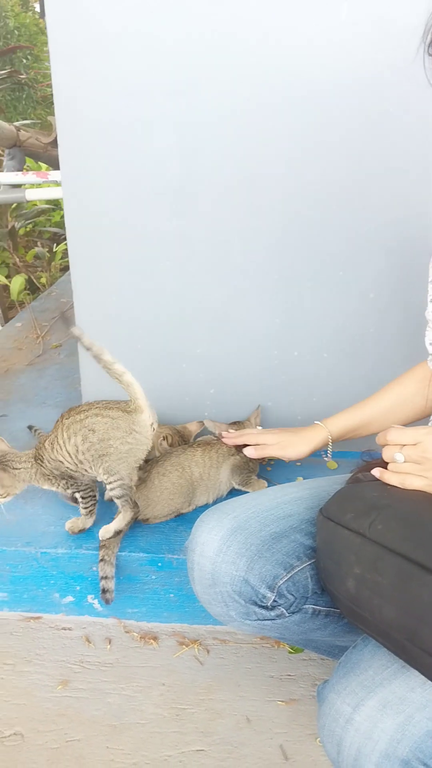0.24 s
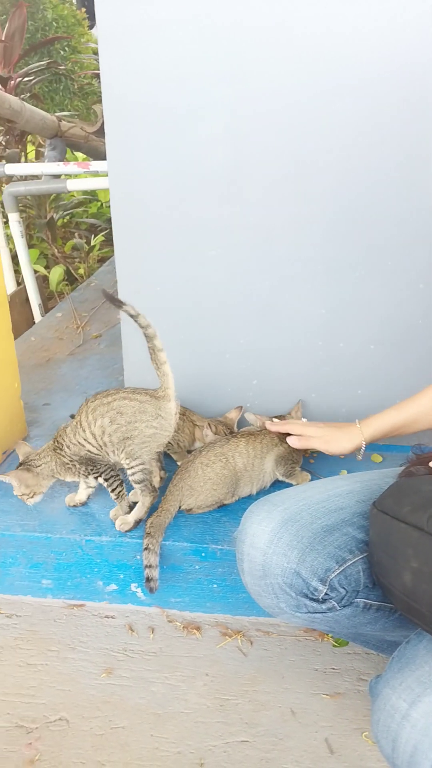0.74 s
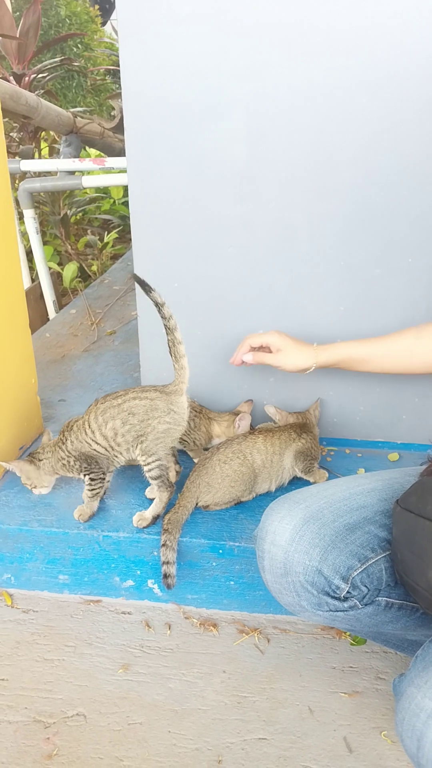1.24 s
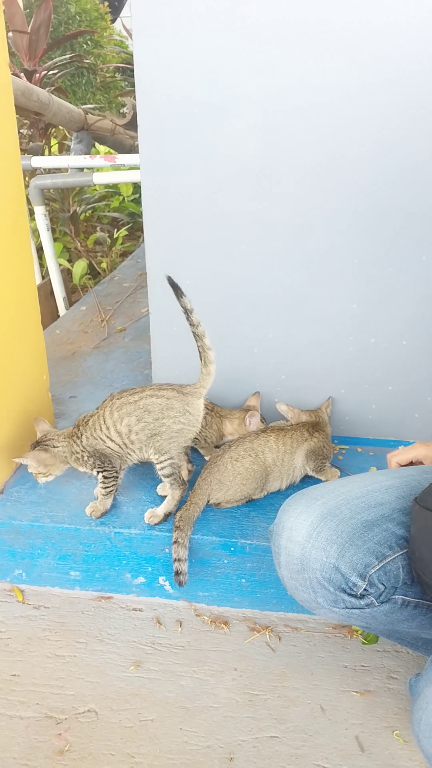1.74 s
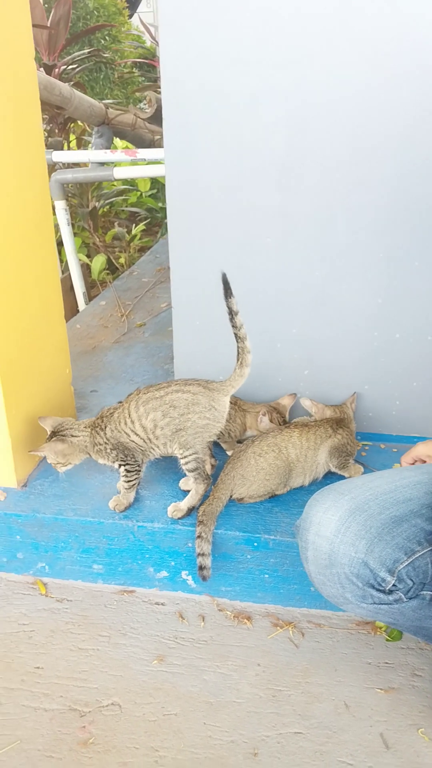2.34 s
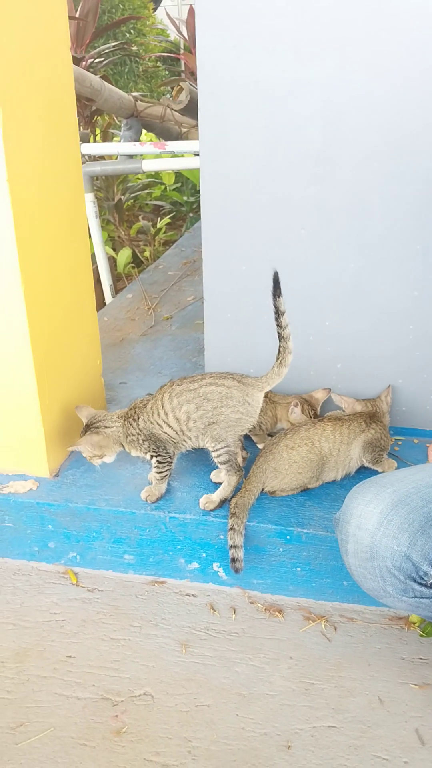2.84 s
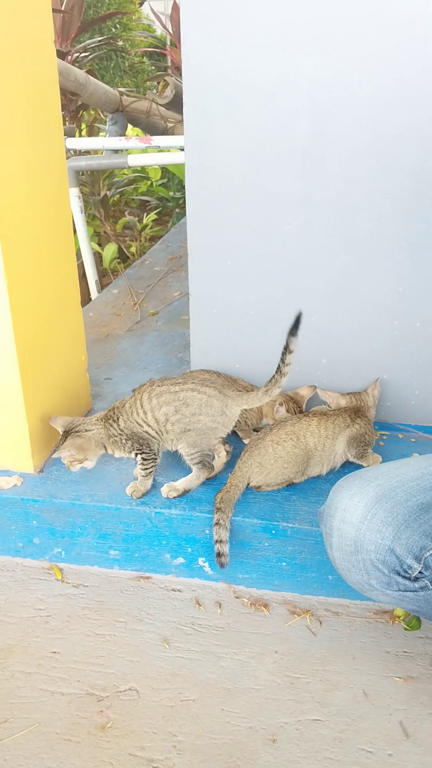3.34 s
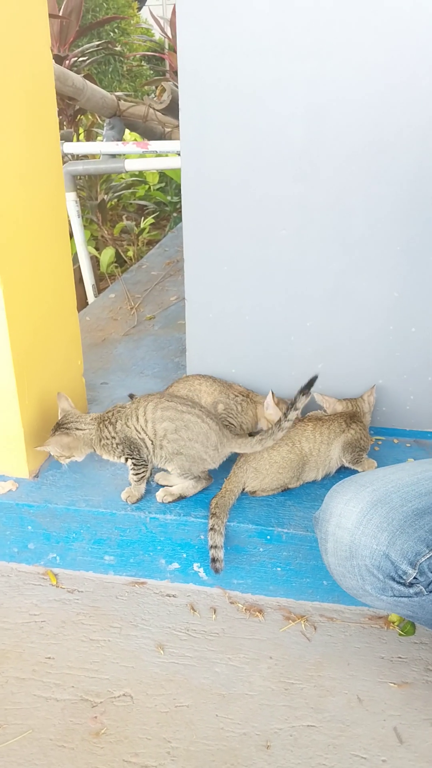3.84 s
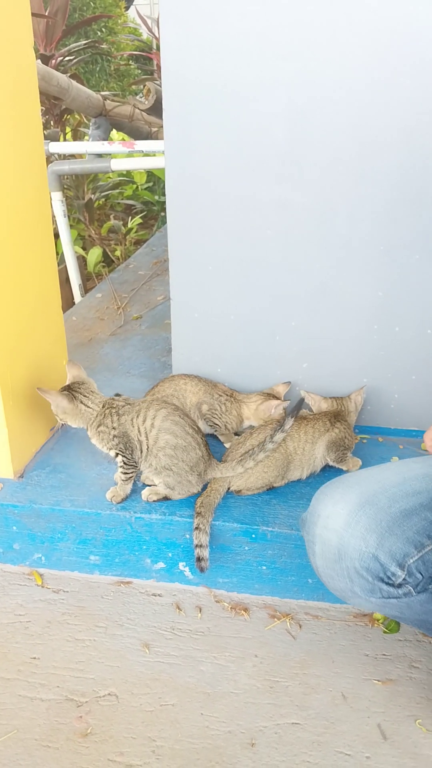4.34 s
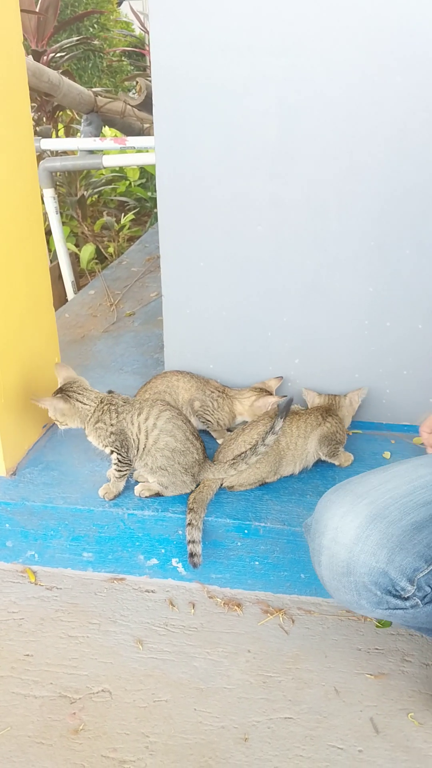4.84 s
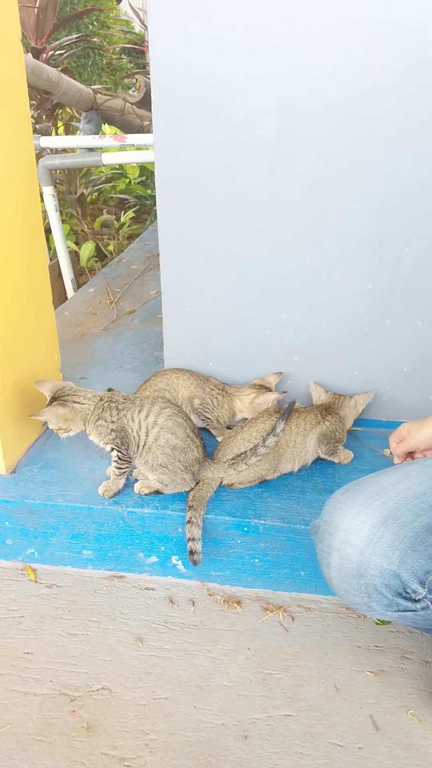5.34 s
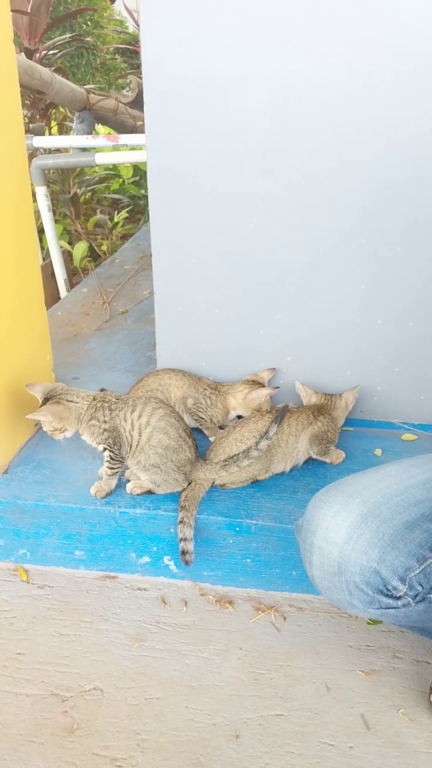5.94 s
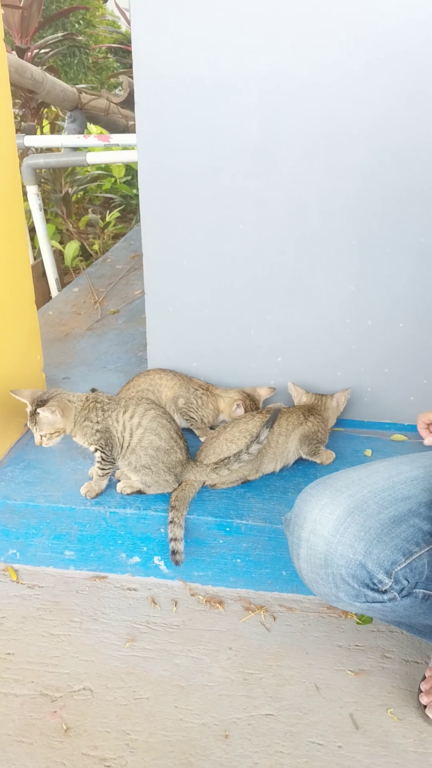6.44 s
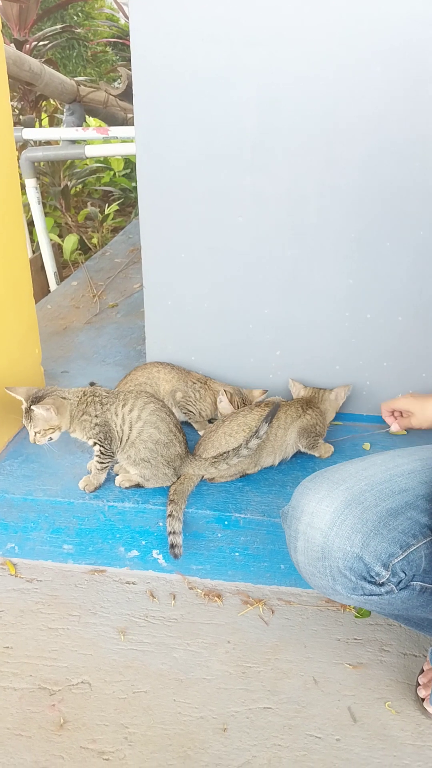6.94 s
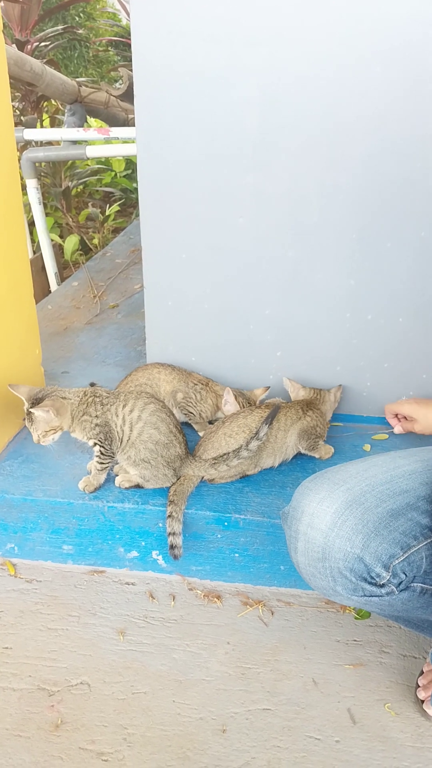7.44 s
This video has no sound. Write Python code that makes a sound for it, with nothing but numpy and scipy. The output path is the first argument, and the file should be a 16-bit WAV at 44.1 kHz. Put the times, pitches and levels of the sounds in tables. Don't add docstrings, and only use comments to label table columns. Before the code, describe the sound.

Throughout, a low, muffled road rumble with gentle roar and soft tyre hiss fills an outdoor spot beside a wall, picked up in stereo by a phone. From about 0.2 to 3.7 s two distant single-cylinder engines putter over each other, pulses slowing, tone hollowing and swelling through wall echoes, with thin gear whines. A far cutting disc sings faintly and high, strengthening near 2.6 s, biting in stuttering bursts from 3.4 to 4.6 s, then fading to small nicks. At 4.1 s a nearer engine enters, swells to its loudest around 4.7 s, dips at 5.1, rises again at 5.5, then recedes and slows in a deep chug until the end at about 7.6 s. Very faint, short falling kitten mews come at 4.7, 5.3 and 5.5 s, almost buried. Tiny bright grit ticks fall at 5.2, 5.7, 6.1 and 7.0 s.

```python
import sys
import numpy as np
from scipy import signal
from scipy.fft import rfft, irfft, next_fast_len
from scipy.io import wavfile
from scipy.ndimage import uniform_filter1d, map_coordinates

SR = 44100
rng = np.random.default_rng(int(sys.argv[2]) if len(sys.argv) > 2 else 0)


def wrap_up_sound(samples):
    columns = np.atleast_2d(samples).T
    tamed = np.clip(columns, -1, 1)
    steps = np.round(tamed * 32767).astype(np.int16)
    wavfile.write(sys.argv[1], SR, steps)


def level_to_linear(level):
    exponent = np.asarray(level, float) / 20
    return 10 ** exponent


N = 339129


def unit(x):
    return x / np.sqrt(np.mean(x ** 2) + 1e-20)


def along(points, hz):
    f, v = np.transpose(points)
    return np.interp(np.log(hz + 1), np.log(f + 1), v)


def curves(rows):
    s, *cols = np.transpose(rows)
    return [np.interp(np.arange(N) / SR, s, c) for c in cols]


def wobble(rate_hz):
    knots = rng.standard_normal(int(N * rate_hz / SR) + 4)
    return map_coordinates(knots, [np.arange(N) * rate_hz / SR])


def filtered(x, response):
    m = next_fast_len(N + SR // 2)
    return irfft(rfft(x, m) * response(np.fft.rfftfreq(m, 1 / SR)), m)[..., :N]


def shaped(spectrum):
    return lambda hz: level_to_linear(along(spectrum, hz)) * (hz > .8 * spectrum[0][0])


def ringing(modes):
    def response(f):
        total = 0
        for k, (centre, width, db) in enumerate(modes):
            loss = 1j * f * width
            total = total + (-1) ** k * level_to_linear(db) * loss / (centre * centre - f * f + loss)
        return total
    return response


# [f/Hz, correlation]
PORT_LIKENESS = [(60, 0.62), (130, 1), (290, 0.84), (640, 0.64), (1410, -0.0021), (3100, -0.14),
                 (6820, -0.15), (15000, -0.028)]


def rush(gain, patchy_db=0):
    z = signal.stft(rng.standard_normal((2, N)), nperseg=512)[2]
    field = uniform_filter1d(rng.standard_normal(z.shape[1:]), 5, 0)
    field = uniform_filter1d(field, 16, 1)
    pair = signal.istft(z * level_to_linear(patchy_db * unit(field)), nperseg=512)[1][:, :N]

    def mid_side_gain(hz):
        turn = np.arccos(np.clip(np.abs(along(PORT_LIKENESS, hz)), 0, 1)) / 2
        return gain(hz) * [np.cos(turn), np.sin(turn)]

    mid, side = filtered(pair, mid_side_gain)
    return np.array([mid + side, mid - side]) / np.std(mid)


def glides(rows):
    out = np.zeros(N)
    for s, length_s, start_hz, end_hz, *orders_db in rows:
        hz = np.linspace(start_hz, end_hz, round(length_s * SR))
        phase = 2 * np.pi * np.cumsum(hz) / SR
        tone = sum(level_to_linear(db + 2.5) * np.sin((k + 1) * phase) for k, db in enumerate(orders_db))
        out[round(s * SR):][:len(hz)] += tone * np.sqrt(np.hanning(len(hz)))
    return out


# [t/s, level/dB]
ROAD_LEVEL = [(.05, -40.5), (.75, -42), (1.35, -40), (1.65, -40), (2.35, -40.5), (2.65, -39.5), (3.1, -41),
              (3.3, -41), (3.7, -42), (4.35, -41), (4.8, -43.5), (5.2, -45.5), (5.9, -44), (6.3, -43.5),
              (6.7, -43.5), (7.1, -43.5), (7.6, -43.5)]
# [f/Hz, level/dB per Hz]
RUMBLE_SPECTRUM = [(13, -68.5), (22, -39), (38, -18), (59, -6.5), (69, -4), (108, 1.5), (140, -1.5),
                   (232, -4), (269, -17), (309, -18), (420, -21.5), (550, -41.5), (920, -120)]
# [f/Hz, level/dB per Hz]
ROAR_SPECTRUM = [(140, -38), (235, -2.5), (290, -4), (314, -12.5), (354, -16.5), (481, -15), (637, -14),
                 (759, -17.5), (1050, -17.5), (1710, -30), (1900, -26), (2470, -59), (4180, -120)]
# [f/Hz, level/dB per Hz]
TYRE_SPECTRUM = [(760, -16), (1300, -1.5), (1670, -3.5), (2140, -6.5), (3070, -8), (3700, -12), (4150, -13),
                 (7500, -22), (8400, -27.5), (12500, -31.5), (15500, -44)]


def road():
    rumble_db, roar_db, hiss_db = 15.3, 5, -5
    rumble_share, hiss_share = .45, 1
    road_db, = curves(ROAD_LEVEL)
    mean_db = road_db.mean()
    swing_db = road_db - mean_db
    rumble_db = mean_db + rumble_db + rumble_share * swing_db + 0.52 * wobble(6.7)
    roar_db = road_db + roar_db + 0.46 * wobble(6)
    hiss_db = mean_db + hiss_db + hiss_share * swing_db + 0.2 * wobble(7.2)
    rumble = level_to_linear(rumble_db) * rush(shaped(RUMBLE_SPECTRUM), patchy_db=0.6)
    roar = level_to_linear(roar_db) * rush(shaped(ROAR_SPECTRUM), patchy_db=0.67)
    hiss = level_to_linear(hiss_db) * rush(shaped(TYRE_SPECTRUM), patchy_db=0.38)
    return rumble + roar + hiss


# [t/s, length/s, f/Hz, level/dB]
WHINE_LINES = [(0, .3, 232, -30), (.85, .35, 632, -47), (1.1, .2, 798, -47), (1.15, .4, 525, -48),
               (1.3, .2, 619, -45), (2.52, .15, 589, -45), (2.6, .4, 567, -51), (2.7, .1, 1048, -48),
               (2.7, .5, 379, -47), (3.05, .2, 654, -46), (2.75, .6, 163, -27), (1.6, .4, 176, -30),
               (3.75, .25, 117, -28), (3.8, .35, 193, -32), (3.85, .65, 379, -46), (4.15, .4, 487, -47),
               (4.55, 1.2, 379, -45.5), (4.75, .35, 516, -47)]


def whines():
    sag = .006
    rows = [(s, length_s, hz, hz * (1 - sag), db) for s, length_s, hz, db in WHINE_LINES]
    return level_to_linear(1.5 * wobble(25)) * glides(rows)


# [t/s, length/s, start f/Hz, order 2 level/dB, order 3 level/dB]
CRIES = [
    (4.71, .09, 530, -45, -56),
    (4.75, .12, 520, -58, -45),
    (5.265, .06, 492, -62, -47),
    (5.5, .11, 535, -62, -50),
]


def mews():
    sag_hz_per_s, first_db = 330, -60
    rows = []
    for s, length_s, hz, *upper_db in CRIES:
        rows.append((s, length_s, hz, hz - sag_hz_per_s * length_s, first_db, *upper_db))
    return glides(rows)


# [t/s, peak level/dB]
GRIT_TICKS = [
    (5.1771, -45),
    (5.6824, -49),
    (5.6854, -48),
    (5.7164, -55),
    (6.0631, -52),
    (6.982, -45),
]


def grit():
    out, t = np.zeros((2, N)), np.arange(SR // 100) / SR
    for s, db in GRIT_TICKS:
        decay = level_to_linear(db + 4 - 60 * t / .009)
        start = round(s * SR)
        out[:, start:start + len(t)] += decay * np.sign(rng.standard_normal(len(t)))
    return filtered(out, lambda hz: 1 / (1 + (9000 / (hz + 1)) ** 6))


# [t/s, level/dB]
CUTTING = [(0.1, -61), (0.58, -57), (1.2, -54), (1.8, -54.5), (2.36, -52.5), (2.63, -46), (3.2, -49.5),
           (3.5, -52.5), (3.8, -52.5), (3.9, -50), (4.54, -59.5), (5.05, -65.5), (6.26, -72), (7.6, -69)]
# [t/s, rise/dB]
DISC_BITES = [(3.3644, 4.5), (3.4625, 8.5), (3.5603, 8.5), (3.6586, 7), (3.7638, 7), (3.8447, 8),
              (3.9135, 3.5), (3.9524, 4), (4.0194, 2), (4.0494, 3), (4.1494, 4), (4.3615, 8), (4.4384, 4),
              (4.5181, 4), (4.6018, 6)]
DISC_NICKS = [4.7735, 4.9666, 5.1472, 5.1771, 5.2244, 5.438, 5.5463, 5.5794, 5.663, 5.6804, 5.7788, 5.9638,
              6.0631, 6.8594]
# [f/Hz, width/Hz, level/dB]
DISC_LOW_MODES = [(5140, 83, 1), (7310, 450, -6.5)]
# [f/Hz, width/Hz, level/dB]
DISC_HIGH_MODES = [(11600, 600, 0), (12400, 300, -5), (13500, 500, -2)]
# [f/Hz, level/dB per Hz]
SPARK_SPECTRUM = [(2350, -32), (4000, -5), (5250, -0.5), (6400, -19.5), (7420, -10), (8590, -8.5),
                  (12000, -5.5), (15500, -10)]


def disc():
    low_over_cut_db, low_sinks_db_per_s = 1.5, 1.4
    low_sag = .974
    bite_fade_s, nick_fade_s, nick_db = 0.096, .018, 7.5
    bite_hold = 1.8
    cut_db, = curves(CUTTING)
    t = np.arange(N) / SR

    bites = [(s, rise_db, bite_fade_s) for s, rise_db in DISC_BITES]
    bites += [(s, nick_db, nick_fade_s) for s in DISC_NICKS]
    bite_db = np.zeros(N)
    for s, rise_db, fade_s in bites:
        since = np.maximum(t - s, 0)
        bite_db += rise_db * np.minimum(since / .003, 1) * np.exp(-(since / fade_s) ** bite_hold)
    bite_db -= uniform_filter1d(bite_db, SR // 6)

    high = level_to_linear(-4) * rush(ringing(DISC_HIGH_MODES), patchy_db=1.2)
    high = high + level_to_linear(-2) * rush(shaped(SPARK_SPECTRUM), patchy_db=1.2)

    load = np.pi / 4 * (1 + np.tanh(0.8 * (t - 1.9) + 0.28 * wobble(2.52)))
    free = rush(lambda hz: ringing(DISC_LOW_MODES)(hz * low_sag), patchy_db=2.0)
    loaded = rush(ringing(DISC_LOW_MODES), patchy_db=2.5)
    low_db = low_over_cut_db - low_sinks_db_per_s * np.minimum(t, 4.5)
    low = level_to_linear(low_db) * (np.cos(load) * free + np.sin(load) * loaded)

    cut = level_to_linear(cut_db - 0.3 + 0.27 * wobble(29.97))
    return cut * (level_to_linear(bite_db) * high + level_to_linear(0.93 * bite_db) * low)


def engine(rows, pipe, walls, flutter_db, slip_rad):
    sound_m_per_s = 343
    firings_hz, level_db = curves(rows)
    start_s, end_s = rows[0][0], rows[-1][0]
    t = np.arange(N) / SR
    since = np.clip(t, start_s, end_s) - start_s
    crank = 2 * np.pi * np.cumsum(firings_hz) / SR
    out = np.zeros((2, N))
    step = slice(None, None, 64)
    for k in range(2, 10):
        hz, u = k * firings_hz[step], since[step]
        paths = 1
        for m, grow, bend, share in walls:
            detour_m = m + grow * u + bend * u ** 2
            paths = paths + share * np.exp(-2j * np.pi * hz * detour_m / sound_m_per_s)
        paths = np.interp(t, t[step], paths * level_to_linear(along(pipe, hz)))
        phase = k * crank + 0.16 * (k - 4.5) ** 2 + slip_rad * wobble(2.97)
        spread = 0.096 * wobble(3.8)
        wave = np.real(paths * np.exp(1j * (phase + np.array([spread, -spread]))))
        out += level_to_linear(level_db + 3 + flutter_db * wobble(12)) * wave
    fade_in = np.clip((t - start_s + 0.1) / 0.15, 0, 1)
    fade_out = np.clip((end_s + 0.42 - t) / 0.11, 0, 1)
    return out * fade_in * fade_out


# [t/s, firing f/Hz, level/dB]
FIRST_RUN = [
    (0.2, 43.1, -46),
    (0.45, 41.97, -37.5),
    (0.95, 40.77, -36),
    (1.45, 40.6, -35.5),
    (1.95, 39.67, -38),
    (2.7, 39.34, -34.5),
    (3.2, 38.47, -51),
]
# [f/Hz, level/dB]
FIRST_EXHAUST = [(60.0, 8), (90.0, -9.5), (110.0, -0.8), (140.0, 7.5), (170.0, 3), (210.0, 2),
                 (250.0, -7.5), (300.0, -18)]
# [detour/m, growth/(m/s), bend/(m/s2), share/1]
FIRST_ECHOES = [(34.24, 4.09, -1.3, 0.45), (30.11, 5.17, 0.28, 0.26), (17.56, 11.01, -2.65, 0.3),
                (17.88, 6.65, 0.47, 0.18)]
# [t/s, firing f/Hz, level/dB]
SECOND_RUN = [
    (.4, 34.9, -42),
    (1.0, 34, -39),
    (1.6, 33.8, -37.5),
    (2.2, 32.9, -36.5),
    (2.8, 31.6, -35),
    (3.7, 29.35, -38),
]
# [f/Hz, level/dB]
SECOND_EXHAUST = [(60, -26), (100, -1.5), (150, -10.5), (200, -1.5), (250, -12.5), (300, -47)]
# [detour/m, growth/(m/s), bend/(m/s2), share/1]
SECOND_ECHOES = [(30.48, 1.7, .27, 1), (22.9, -1.17, 0.708, 0.43), (9.38, 6, -1.243, 0.4)]


def far_engines():
    first = engine(FIRST_RUN, FIRST_EXHAUST, FIRST_ECHOES, flutter_db=1.2, slip_rad=.3)
    second = engine(SECOND_RUN, SECOND_EXHAUST, SECOND_ECHOES, flutter_db=1.5, slip_rad=.4)
    return first + second


# [t/s, firing f/Hz, level/dB]
NEAR_RUN = [
    (4.1, 38.51, -34),
    (4.25, 38.58, -30.5),
    (4.42, 36.88, -25),
    (4.74, 34.91, -21.5),
    (5.12, 33.7, -27),
    (5.55, 33.17, -23.5),
    (6.2, 30.9, -27),
    (6.85, 29.31, -29),
    (7.65, 27.98, -31.6),
]
# [f/Hz, level/dB]
NEAR_EXHAUST = [(60, -25), (90, 2), (110, 0.2), (140, -2.5), (170, -4), (210, -2), (250, -12.5),
                (300, -26.5)]
# [detour/m, growth/(m/s), bend/(m/s2), share/1]
NEAR_ECHOES = [(10.53, 3.25, -0.12, 0.25), (21.25, -1.19, 0.42, 0.32), (31.63, 2.1, 0.29, 0.24),
               (1.78, 5.97, -0.59, 0.17), (34.04, -8.11, 1.84, 0.11), (16.44, -7.63, 1.82, 0.13)]


def near_engine():
    return engine(NEAR_RUN, NEAR_EXHAUST, NEAR_ECHOES, flutter_db=.9, slip_rad=.1)


def scene():
    return road() + whines() + mews() + grit() + disc() + far_engines() + near_engine()


# [f/Hz, left minus right level/dB]
PORT_LEAN = [(60, -2), (180, -2.5), (550, -3), (1650, -2.5), (4970, -2), (15000, 1)]


def ports(dry):
    lead_s, top_hz = 1 / 8500, 15750
    sides = np.array([[.5], [-.5]])

    def response(hz):
        lead = np.exp(2j * np.pi * hz * lead_s * sides)
        return level_to_linear(along(PORT_LEAN, hz) * sides) * lead * (hz < top_hz)

    return filtered(dry, response)


def roll_off(x):
    return signal.sosfilt(signal.butter(12, 15640, fs=SR, output="sos"), x)


def record(dry):
    return roll_off(ports(dry))


dry = scene()
out = record(dry)
wrap_up_sound(out)
```